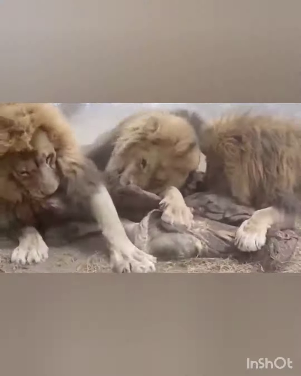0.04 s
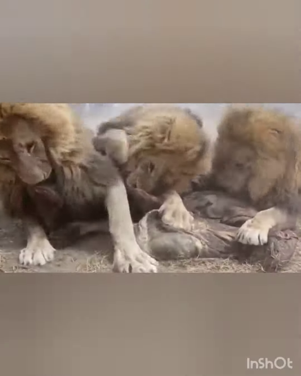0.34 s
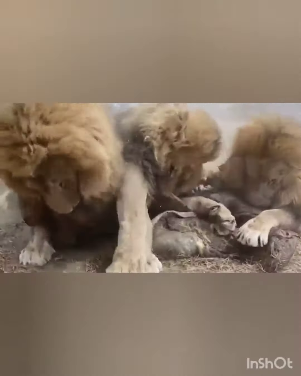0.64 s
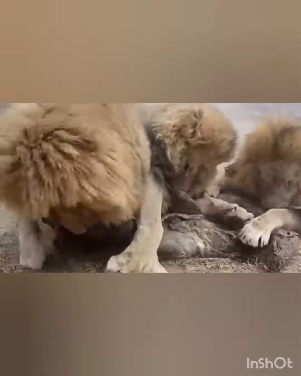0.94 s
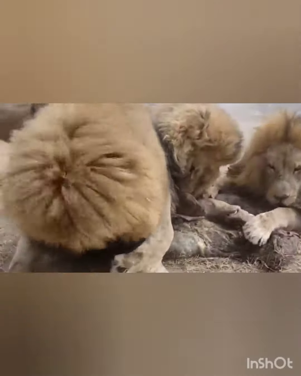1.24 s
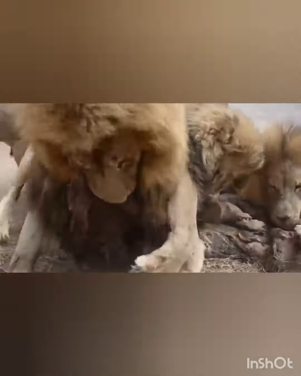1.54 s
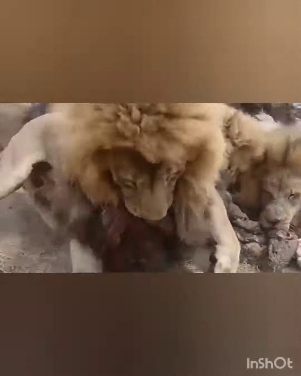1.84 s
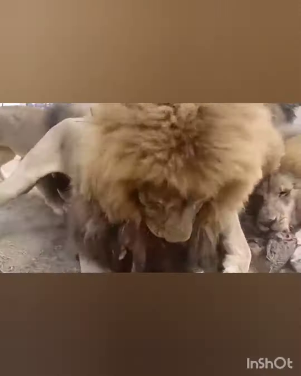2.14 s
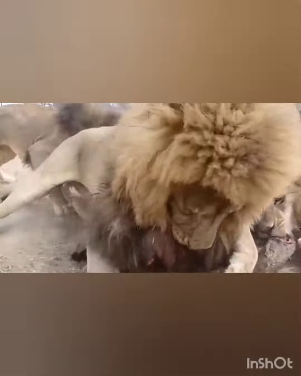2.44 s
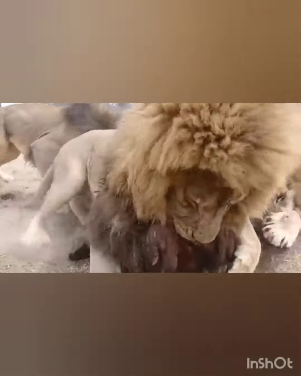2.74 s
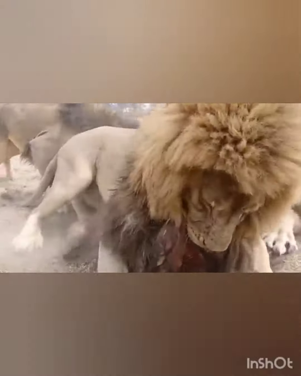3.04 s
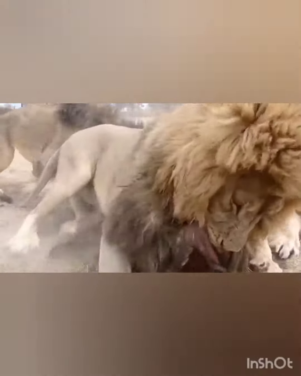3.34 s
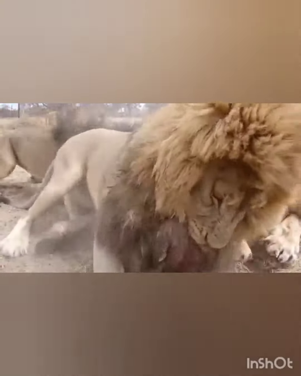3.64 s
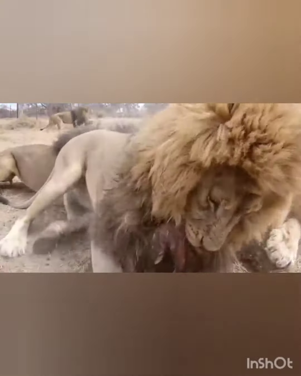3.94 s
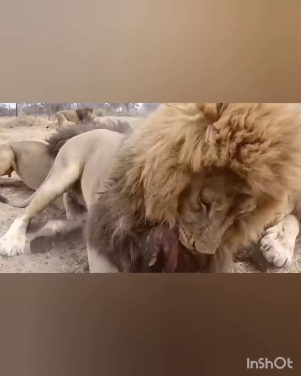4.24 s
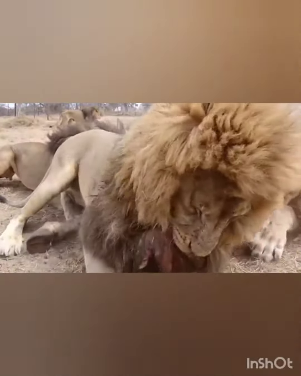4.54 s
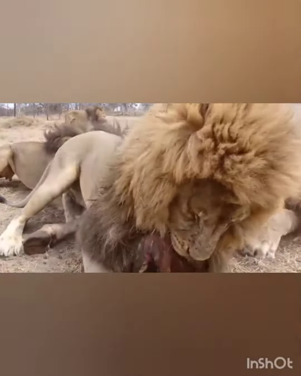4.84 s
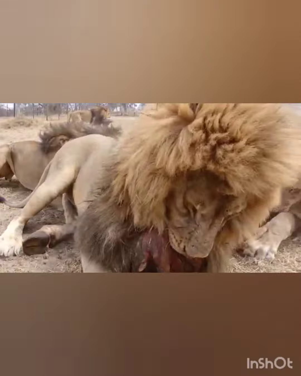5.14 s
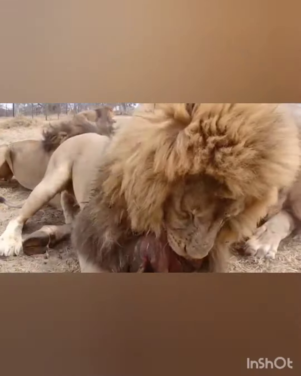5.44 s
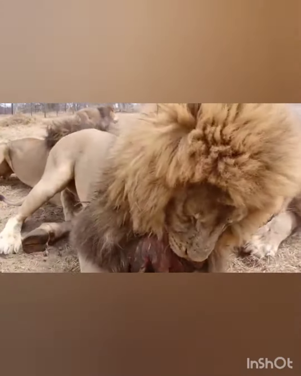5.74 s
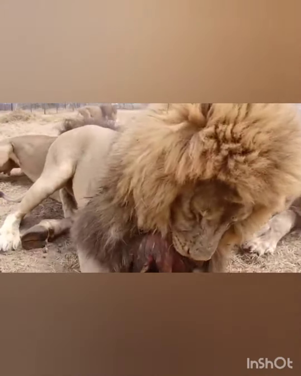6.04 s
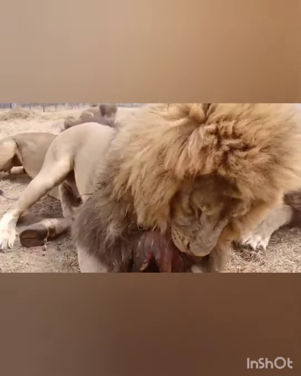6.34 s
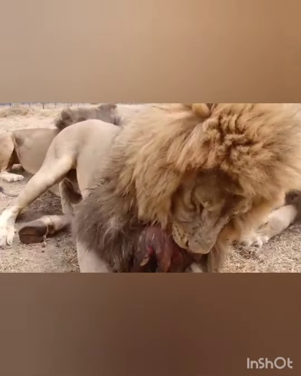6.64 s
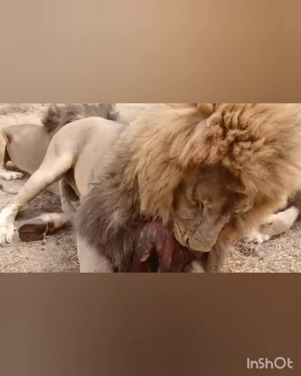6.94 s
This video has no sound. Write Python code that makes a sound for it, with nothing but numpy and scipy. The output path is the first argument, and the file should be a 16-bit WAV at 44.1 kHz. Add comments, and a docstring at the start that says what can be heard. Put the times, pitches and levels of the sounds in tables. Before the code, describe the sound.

Close, low, throaty growls of feeding lions come one after another, mixed with breathy snarls and faint crackles.

```python
"""Lions growling over a carcass

The nearest lion growls in slow vocal-fold pulses that excite the resonances of chest, throat and mouth.
Turbulent air past its teeth makes hissing snarls, and the pulses of other lions merge into a rumble.
Soft moans and thin whistles come and go; paws and teeth crackle in the meat and dry grass."""
import sys
import numpy as np
from scipy import signal
from scipy.fft import rfft, irfft
from scipy.io import wavfile
from scipy.ndimage import uniform_filter1d

SR = 44100
rng = np.random.default_rng(int(sys.argv[2]) if len(sys.argv) > 2 else 0)


def to_wav(sig):
    """Store sig (one row per channel, or 1-D mono) as 16-bit WAV at the path in sys.argv[1].

    Samples outside -1..1 are clipped; the rate is SR.
    """
    pcm = np.clip(np.atleast_2d(sig), -1, 1) * 32767
    pcm = np.round(pcm).astype(np.int16)
    wavfile.write(sys.argv[1], SR, pcm.T)  # frames by channels


N = 312228
TIME = np.arange(N) / SR

# Growls: (start [s], duration [s], pulse rate at start [Hz], at middle [Hz], at end [Hz],
# relative level [dB], fade [dB], throat opening gain [dB], mouth opening gain [dB],
# moment of widest jaw [share of duration], other lions' relative level [dB], their fade [dB])
GROWLS = [(.014, 0.4, 36.22, 26.22, 28.4, -16.5, 7.5, 11.5, 4.5, 0.6, -22.5, 14),
          (0.499, 0.42, 27.66, 32.85, 22.7, -23, -14, -7, -3, 0.93, -21, 2.5),
          (1.0, 0.34, 29.09, 30.33, 28.53, -17.5, 2.5, 5, 9, 0.57, -18.5, 10),
          (1.545, 0.18, 28.34, 35.47, 40.6, -24.5, 7, -5, 5, 1, -18, 6),
          (1.803, 0.21, 23.93, 32.98, 38.55, -16, 13, 13, 10.5, 0.49, -17, 16),
          (2.042, 0.195, 27.86, 28.14, 28.16, -31, 5, 10, 3, 0.53, -29, 3.5),
          (2.55, .12, 28.27, 33.55, 41.2, -20, 7, 14.5, 6, 0.57, -14, 9.4),
          (2.69, 0.1, 29.96, 30, 29.7, -27, -1, 6, 0, 0.25, -28, -3),
          (2.823, 0.44, 38.45, 32.99, 21.57, -17, 9.5, 7.5, 11, 0.61, -17, 10.5),
          (3.719, 0.61, 27.72, 38.84, 26.1, -16.5, 9, 17, 13.5, 0.61, -15.5, 28),
          (4.356, .242, 31.2, 22.51, 38.2, -24.5, 3, 11.5, 7, 0.26, -26, 3),
          (4.66, .44, 34.15, 33.42, 29.13, -18, 13, 18.5, 15, 0.66, -16.5, 30),
          (5.511, 0.5, 33.22, 25.51, 32.14, -17.5, 10.5, 15.5, 9.5, 0.5, -16.5, 11.5),
          (6.061, .16, 26.88, 21.93, 22.43, -31, -2, 13.5, 18, 0.63, -24.5, 5.8),
          (6.379, 0.15, 30.15, 25.65, 26.8, -15.5, 22, 3, 4.5, 0.17, -18, 22),
          (6.555, 0.39, 30.12, 31.04, 34.25, -19.5, 35, -9, 8.5, 0.57, -20.5, 11.6)]
# Hard closures of the throat: (time [s], relative peak [dB])
POPS = [(0.277, -8.5), (.318, -11), (0.389, -11.5), (0.601, -14.5), (1.266, -6), (1.935, -2), (1.968, -7.5),
        (3.141, -20), (4.128, -23), (4.19, -12), (4.957, -6.5), (5.054, -9.5), (5.089, -22), (5.93, -13),
        (6.382, -12.5), (6.416, -6.5)]
# Hoarse rasps: (start [s], duration [s], centre frequency [Hz], bandwidth [Hz], level [dB])
RASPS = [(.006, 0.039, 1390, 400, -36), (0.013, 0.12, 760, 160, -33.5), (0.726, 0.11, 1450, 300, -39.5),
         (0.932, 0.14, 1530, 480, -35), (1.119, 0.02, 835, 302, -26), (1.12, .1, 3630, 1400, -40),
         (1.156, 0.11, 730, 130, -38), (1.55, 0.2, 1490, 320, -41.5), (1.792, 0.017, 860, 600, -28.5),
         (2.689, 0.057, 1430, 250, -36.5), (3.072, 0.021, 870, 130, -29.5), (3.101, 0.025, 1110, 500, -32),
         (3.138, 0.015, 1230, 500, -30.5), (3.782, 0.093, 856, 260.2, -29), (3.785, 0.08, 2200, 1200, -35),
         (4.706, 0.033, 2360, 400, -26.5), (4.731, .05, 3437, 1400, -29.5), (5.569, .035, 2310, 250, -37.5),
         (6.409, 0.04, 2400, 350.2, -46), (6.611, 0.021, 1301, 1012, -34), (6.647, .018, 1410, 1000, -34.5),
         (6.67, 0.26, 440, 71.4, -32.5), (6.763, 0.047, 2217, 110, -41)]
# Snarls: (peak time [s], rise [s], fall [s], relative hiss level [dB], relative scuff level [dB])
SNARLS = [(.04, 0.34, 0.17, -29, -38), (.28, 0.15, 0.25, -40, -69), (.55, 0.057, .12, -33, -42.5),
          (.74, 0.0069, 0.17, -34, -63), (.95, .29, 0.21, -30, -40), (1.13, 0.061, 0.14, -29, -44),
          (1.37, 0.048, 0.63, -33.5, -49), (1.68, 0.2, 0.074, -29, -64), (1.8, 0.31, 0.13, -32, -39),
          (1.91, 0.2, .04, -34.5, -48), (2.62, 0.21, 0.11, -40, -62.5), (2.731, 0.076, 0.25, -32.5, -36.3),
          (2.89, 0.086, 0.1, -26.5, -42), (3.13, 0.72, 0.13, -45.5, -66), (3.59, 0.18, 0.3, -41, -49),
          (3.837, 0.11, 0.064, -23, -31), (4.04, 0.3, 0.44, -41, -74), (4.551, 0.22, 0.18, -39.6, -48.5),
          (4.745, 0.085, 0.092, -20.5, -32), (4.93, .21, 0.11, -37, -59), (5.58, .13, 0.037, -31, -45),
          (5.756, 0.19, 0.082, -28, -37.5), (5.9, 0.12, 0.094, -43, -78.5),
          (6.16, 0.038, 0.4, -41.5, -48.5), (6.42, 0.092, .35, -38, -69), (6.759, 0.075, 0.27, -34, -48)]
# Moans, one contour each: (time [s], pitch [Hz], level [dB])
MOANS = [
    [(.41, 213, -28), (.46, 187.4, -36.5), (.5, 165, -25)],
    [(1.33, 184.5, -33), (1.42, 161.5, -25.5), (1.53, 172, -32)],
    [(3.3, 201, -44), (3.38, 188, -41.5), (3.43, 147, -34.5), (3.52, 140, -43)],
    [(5.13, 158, -56), (5.18, 212.6, -43), (5.25, 228, -41), (5.31, 232.5, -37.5), (5.39, 225.4, -32.5),
     (5.45, 230, -38), (5.51, 224.9, -47)],
    [(6.91, 174, -41), (7, 169.3, -34.5), (7.1, 160.6, -26)],
]
# Whistles: (start [s], duration [s], start pitch [Hz], end pitch [Hz], relative level [dB])
WHISTLES = [(2.656, 0.0346, 497, 825, -41), (3.01, 0.022, 763.7, 1150, -28.5), (4.27, 0.03, 776, 1074, -31),
            (4.647, 0.034, 806.7, 1375, -29.5), (4.733, 0.021, 570, 905, -29),
            (5.521, 0.03605, 978.6, 1424, -34), (6.325, 0.063, 3080, 2030, -61),
            (6.881, 0.062, 3560, 2940, -47), (6.945, 0.014, 5100, 3577, -55),
            (6.974, 0.043, 3180, 1880, -50)]
# Breaking gristle and dry grass: (time [s], relative level [dB])
SNAPS = [(0.2506, -28), (.97, -46), (1.003, -46), (1.074, -24), (1.123, -24.5), (1.73, -16), (1.798, -30),
         (2.375, -38), (2.61, -24), (2.673, -24.5), (2.6999, -27), (2.7352, -40), (3.7868, -11),
         (4.653, -27.5), (5.7502, -20), (5.786, -20.5), (6.133, -25), (6.157, -19), (6.199, -20),
         (6.381, -31), (6.416, -33), (6.653, -30.5)]
# Other lions' rumbles between growls: (start [s], duration [s], level [dB])
GRUMBLES = [(2.255, 0.31, -34), (1.35, 0.28, -26.5), (3.452, 0.358, -35), (5.38, 0.12, -38),
            (6.203, 0.186, -29.5)]
# Continuous rustle beneath the snarls: (time [s], relative level [dB])
RUSTLE = [(0, -53.5), (2, -56), (2.15, -52.5), (2.3, -57), (2.45, -51.5), (3.35, -52), (4.95, -57),
          (5.15, -68.5), (5.42, -46), (5.85, -58), (6.02, -57), (6.3, -51.5), (7.08, -53.5)]

# Responses of the bodies struck by pulses: (frequency [Hz], relative gain [dB])
CHEST_SPECTRUM = [(20, -15.5), (40, -8), (65, -10), (100, 6), (145, 2), (200, -1), (280, -15), (420, -23.5),
                  (900, -72), (3000, -76)]
THROAT_SPECTRUM = [(60, -43.5), (190, 11), (280, -2.5), (400, 0), (470, -2.5), (560, 7), (680, -12),
                   (1000, -14), (1400, -61), (4000, -87)]
MOUTH_SPECTRUM = [(150, -7.5), (480, -9.5), (620, 8), (800, 8.5), (1020, -8), (1200, -8.5), (1900, -6),
                  (2600, -34), (8000, -76)]
POP_SPECTRUM = [(80, -75), (220, 24.5), (400, 19.5), (600, 4), (820, 8.5), (1100, -7), (1900, -29),
                (4000, -26), (12000, -38)]
RIVAL_SPECTRUM = [(20, -42.5), (40, -41.5), (60, 5), (105, 3), (160, 5.5), (210, -2.5), (290, -18.5),
                  (450, -23), (650, -71), (900, -33), (1300, -33), (4000, -92)]
# Spectra of the noise sources: (frequency [Hz], relative level [dB])
SNARL_SPECTRUM = [(300, 8.5), (600, -5.5), (850, 2.5), (1100, -4), (1450, -1.5), (1900, -1.5), (2250, -1.5),
                  (2600, -6), (3100, 0), (3600, -9), (3900, -8.5), (4600, -12), (6000, -18.5),
                  (12000, -27.5)]
SNAP_SPECTRUM = [(200, -22), (800, -11), (3000, 8), (6000, 3), (10000, -3.5), (15000, -30.5)]
SCUFFLE_SPECTRUM = [(500, 12), (2000, -35), (4000, 2), (5500, 2), (7500, 2), (10000, -0.5), (11500, -5),
                    (13000, -10), (15000, -14.5)]
AIR_SPECTRUM = [(20, 0), (60, -9), (150, 5.5), (400, -14), (700, -21.5), (1500, -29), (4000, -46),
                (15000, -58)]
# Cavity modes: (frequency [Hz], decay time [s], greatest glide [Hz/s], pitch scatter [fraction])
NECK_MODE = (256, .016, 620, 0.07)
THROAT_MODE = (375, .012, 470, 0.046)
HOLLOW_MODE = (475, 0.011, 270, 0.03)
MOUTH_MODE = (770, 0.011, 11700, 0.147)
LIP_MODE = (1150, 0.0095, 31300, 0.25)

SWELL_S = .007  # build-up of one pulse
FADE_POWER = 3.15  # a growl holds, then most sag as the air runs out


def growl(attack_s=.025, jaw_span=.44, shimmer_db=2.87, gust_s=.0048):
    """Source and filter: fold pulses drive cavities that open with the jaw. Returns sound and air flow."""
    responses = [pulse_response(body) for body in (CHEST_SPECTRUM, THROAT_SPECTRUM, MOUTH_SPECTRUM)]
    throat_shut_db, mouth_shut_db = -18, -29.5
    voice, flow = np.zeros(N), np.zeros(N)
    age = np.arange(len(responses[0])) / SR / gust_s
    gust = 2 * age * np.exp(1 - 2 * age)
    for start, length, *rates, level_db, fade_db, throat_db, mouth_db, widest, _, _ in GROWLS:
        for s in pulse_times(start, length, rates):
            progress = (s - start) / length
            attack = min(.88 + (s - start) / attack_s, 1)
            effort = attack * gain_of(level_db - fade_db * progress ** FADE_POWER)
            jaw = np.exp(-((progress - widest) / jaw_span) ** 2)
            throat_gain = gain_of(throat_shut_db + throat_db * jaw)
            mouth_gain = gain_of(mouth_shut_db + mouth_db * jaw)
            pulse = vocal_tract(*responses, throat_gain, mouth_gain) * np.sqrt(SR / np.mean(rates))
            shimmer = gain_of(shimmer_db * rng.standard_normal())
            add(voice, s - SWELL_S, pulse * effort * shimmer)
            add(flow, s, gust)
    return voice, flow


def pulse_times(start, length, rates, pull_s=.012):
    """The folds close once a cycle at a gliding rate; a pop draws any nearby closure onto itself."""
    t = np.arange(0, length, 1 / SR)
    rate = np.interp(t / length, [0, .5, 1], rates)
    cycles = np.floor(np.cumsum(rate) / SR)
    times = start + t[np.diff(cycles, prepend=-1) > 0]
    for s, _ in POPS:
        times = np.where(abs(times - s) < pull_s, s, times)
    return times


def vocal_tract(chest, throat, mouth, throat_gain, mouth_gain):
    """Parallel resonators: chest, throat and mouth answer one closure, and their sounds add."""
    opening = min(throat_gain, 1)
    drive = closure(looseness=.12 + .25 * opening)
    low = cavity(chest, drive, breath=.2) / (1 + .99 * throat_gain)  # an open throat drains the chest
    middle = .58 * cavity(throat, drive, breath=.2) + .24 * mode(*THROAT_MODE) + .55 * mode(*NECK_MODE)
    middle += .35 * opening * mode(*HOLLOW_MODE)
    high = cavity(mouth, drive, breath=.3) + .75 * mode(*MOUTH_MODE) + .25 * mode(*LIP_MODE)
    return low + throat_gain * middle + mouth_gain * high


def closure(looseness, size=2048):
    """Impulsive excitation: the folds slap shut, and loose tissue flaps weakly after them."""
    drive = np.zeros(size)
    drive[0] = -1
    drive[int(rng.uniform(.006, .018) * SR)] = looseness * rng.standard_normal()
    return drive


def cavity(response, drive, breath, puff_s=.014):
    """Forced response: a closure and its puff of air are convolved with a cavity; unit energy."""
    t = np.arange(len(response)) / SR
    puff = rng.standard_normal(len(t)) * np.sqrt(t) * np.exp(-t / puff_s)
    sound = signal.fftconvolve(drive + breath * puff / np.linalg.norm(puff), response)[:len(t)]
    return sound / np.linalg.norm(sound)


def mode(hz, decay_s, glide, scatter, size=2048):
    """Damped free oscillation: a cavity rings on after a pulse, bending upward; unit energy."""
    t = np.maximum(np.arange(size) / SR - SWELL_S, 0)
    pitch = hz * np.exp(scatter * rng.standard_normal()) + glide * rng.random() * t
    tone = np.sin(phase_of(pitch)) * np.exp(-t / decay_s) * np.tanh(t * hz)
    return tone / np.linalg.norm(tone)


def pops(level_db=-4):
    """Impulse response: the throat snaps shut hard and rings briefly."""
    out, response = np.zeros(N), pulse_response(POP_SPECTRUM)
    for s, db in POPS:
        add(out, s - SWELL_S, -gain_of(db + level_db) * response / abs(response).max())
    return out


def rasps():
    """Resonance: turbulence in the narrowed throat briefly excites a single band."""
    out = np.zeros(N)
    for s, length, hz, width, db in RASPS:
        count = int(length * SR)
        detuning = 2 * (np.fft.rfftfreq(count, 1 / SR) - hz) / width
        band = irfft(rfft(rng.standard_normal(count)) / (1 + detuning ** 2), count)
        add(out, s, gain_of(db) * unit_rms(band * signal.windows.tukey(count, .5)))
    return out


def snarl(flow, throb=1.08, roughness=.22):
    """Turbulence: air hisses past wet teeth, modulated by the pulsing flow through the folds."""
    gusts = (1 + throb * flow) * np.exp(roughness * wander(110))
    gusts /= np.sqrt(uniform_filter1d(gusts ** 2, size=3000))
    return shaped_noise(SNARL_SPECTRUM, patchy_db=2.8) * gusts


def snarl_envelopes(edge_db=-18.5, roundness=1.58):
    """Incoherent sounds add in power: snarls swell over the rustle. Returns hiss and dirt amplitudes."""
    rustle_db, = follow(RUSTLE, TIME)
    hiss_power, dirt_power = gain_of(rustle_db) ** 2, gain_of(rustle_db - 2) ** 2
    for s, rise, fall, hiss_db, scuff_db in SNARLS:
        near = (TIME > s - 2 * rise) & (TIME < s + 2 * fall)
        t = TIME[near] - s
        swell_db = edge_db * np.maximum(-t / rise, t / fall) ** roundness
        hiss_power[near] += gain_of(hiss_db + swell_db) ** 2
        dirt_power[near] += gain_of(scuff_db + swell_db) ** 2
    return np.sqrt(hiss_power), np.sqrt(dirt_power)


def flutter(depth_db=1.5, puff_s=.016):
    """Random amplitude modulation: a gain that breaks a hiss into uneven puffs."""
    puffs = signal.oaconvolve(rng.standard_normal(N), np.hanning(int(2 * puff_s * SR)), "same")
    return gain_of(depth_db * unit_rms(puffs))


def moans(second_harmonic_db=-27, waver=.016):
    """Voicing through a closed mouth: a wavering fundamental with a weak second harmonic."""
    out = np.zeros(N)
    for contour in MOANS:
        t = np.arange(contour[0][0], contour[-1][0], 1 / SR)
        hz, db = follow(contour, t)
        phase = phase_of(hz * (1 + waver * wander(500, len(t))))
        tone = np.sin(phase) + gain_of(second_harmonic_db) * np.sin(2 * phase)
        add(out, t[0], np.sqrt(2) * gain_of(db) * tone * signal.windows.tukey(len(t), .15))
    return out


def whistles(fade=1.66, waver=.045):
    """Frequency modulation: thin tones glide unsteadily as they fade."""
    out = np.zeros(N)
    for s, length, start_hz, end_hz, db in WHISTLES:
        progress = np.linspace(0, 1, int(length * SR))
        pitch = (start_hz + (end_hz - start_hz) * progress) * (1 + waver * wander(30, len(progress)))
        envelope = np.exp(-fade * progress) * signal.windows.tukey(len(progress), .35)
        add(out, s, 2 * gain_of(db) * envelope * np.sin(phase_of(pitch)))
    return out


def snaps(decay_s=.006, level_db=-8):
    """Fracture: gristle and stalks break in exponentially decaying bursts of noise."""
    out, response = np.zeros(N), impulse_response(SNAP_SPECTRUM)
    response = response / np.linalg.norm(response)
    t = np.arange(len(response)) / SR
    for s, db in SNAPS:
        burst = rng.standard_normal(len(t)) * np.exp(-t / decay_s)
        add(out, s, gain_of(db + level_db) * signal.fftconvolve(burst, response))
    return out


def scuffle(flow, grains_per_s=600, spread_db=4.5, grit=.74, level_db=-2, throb=.52):
    """Friction: dirt and grass under paws give hiss and random clicks, which throb with the growl."""
    grains = (rng.random(N) < grains_per_s / SR) * rng.choice([-1, 1], N)
    strength = gain_of(spread_db * np.minimum(rng.exponential(1, N), 3.5))
    crackle = unit_rms(signal.oaconvolve(grains * strength, impulse_response(SCUFFLE_SPECTRUM))[:N])
    hiss = shaped_noise(SCUFFLE_SPECTRUM, patchy_db=4)
    return (hiss + grit * crackle) * (1 + throb * flow) * gain_of(level_db)


def rivals(pulses_per_s=70, rise_s=.013, fall_s=.036):
    """Superposition: pulses of farther lions overlap into a rumble, during and between the growls."""
    cycles = np.cumsum(pulses_per_s * np.exp(.5 * wander(600))) / SR
    pulses = np.diff(np.floor(cycles), prepend=0) * rng.standard_normal(N)
    rumble = signal.oaconvolve(pulses, impulse_response(RIVAL_SPECTRUM))[:N]
    rumble /= np.sqrt(abs(uniform_filter1d(rumble ** 2, size=3000)) + 1e-14)
    envelope = np.zeros(N)
    for s, length, db in GRUMBLES:
        add(envelope, s, gain_of(db) * signal.windows.tukey(int(length * SR), .8))
    for start, length, *_, db, fade_db in GROWLS:
        progress = np.clip((TIME - start) / length, 0, 1)
        outside = np.maximum(start - TIME, 0) / rise_s + np.maximum(TIME - start - length, 0) / fall_s
        answer = gain_of(db - fade_db * progress ** FADE_POWER) * np.exp(-outside)
        envelope = np.maximum(envelope, answer)
    return rumble * envelope


def open_air(level_db=-45):
    """Ambient noise: a faint, steady floor with most of its power at low frequencies."""
    return gain_of(level_db) * shaped_noise(AIR_SPECTRUM, patchy_db=1.5)


def shaped_noise(spectrum, patchy_db, size=512):
    """Filtered white noise whose colour shifts in short random patches; unit rms."""
    frames = dict(fs=SR, nperseg=size, noverlap=size * 3 // 4)
    hz, _, bins = signal.stft(rng.standard_normal(N), **frames)
    patches = uniform_filter1d(rng.standard_normal(bins.shape), size=4, axis=0)
    patches = unit_rms(uniform_filter1d(patches, size=16, axis=1))
    bins = bins * gain_of(spectrum_db(spectrum, hz)[:, None] + patchy_db * patches)
    return unit_rms(signal.istft(bins, **frames)[1][:N])


def pulse_response(spectrum, phase_share=.57, size=4096):
    """With only part of the minimum phase, a pulse swells for SWELL_S before it rings on."""
    log_gain = minimum_phase(spectrum, size)
    pulse = np.fft.ifft(np.exp(log_gain.real + 1j * phase_share * log_gain.imag)).real
    return np.roll(pulse, int(SWELL_S * SR))[:size // 2] * signal.windows.tukey(size // 2, .1)


def impulse_response(spectrum, size=4096):
    """The causal response of a body with this spectrum."""
    return np.fft.ifft(np.exp(minimum_phase(spectrum, size))).real[:size // 2]


def minimum_phase(spectrum, size):
    """Complex log gain: the Hilbert transform yields the phase from the log magnitude."""
    hz = abs(np.fft.fftfreq(size, 1 / SR))
    return signal.hilbert(np.log(gain_of(spectrum_db(spectrum, hz)))).conj()


def spectrum_db(spectrum, hz):
    """Levels interpolated on a logarithmic frequency axis."""
    knots_hz, db = np.transpose(spectrum)
    return np.interp(np.log(hz + 1), np.log(knots_hz + 1), db)


def follow(contour, t):
    """Each column of a contour, interpolated at the times t."""
    times, *columns = np.transpose(contour)
    return [np.interp(t, times, column) for column in columns]


def wander(span, count=N):
    """Low-pass noise: a moving average over span samples; unit rms."""
    return unit_rms(uniform_filter1d(rng.standard_normal(count), size=span))


def phase_of(hz):
    """Phase is the time integral of angular frequency."""
    return 2 * np.pi * np.cumsum(hz) / SR


def gain_of(db):
    """Decibels to amplitude."""
    return 10 ** (np.asarray(db) / 20)


def unit_rms(x):
    """Normalises to unit mean power."""
    return x / np.sqrt(np.mean(x ** 2) + 1e-20)


def add(mix, s, sound):
    """Superposes a sound on the mix at s seconds."""
    part = mix[max(round(s * SR), 0):][:len(sound)]
    part += sound[:len(part)]


def scene():
    """Linear superposition: the lions, the ground and the open air sum in one channel."""
    voice, flow = growl()
    hiss_level, dirt_level = snarl_envelopes()
    hisses = flutter() * (hiss_level * snarl(flow) + dirt_level * scuffle(flow))
    air = open_air()
    throats = voice + pops() + rasps() + moans() + rivals()
    return (throats + hisses + snaps() + whistles() + air)[None]


def record(dry):
    """Soft saturation: the microphone rounds the tallest pulses; a low-pass filter limits the band."""
    ceiling, cutoff_hz = .68, 14900
    rounded = dry / (1 + (dry / ceiling) ** 6) ** (1 / 6)
    low_pass = signal.firwin(511, cutoff_hz, window=("kaiser", 9), fs=SR)
    return signal.oaconvolve(rounded, low_pass[None], "same")


dry = scene()
out = record(dry)
to_wav(out)
```